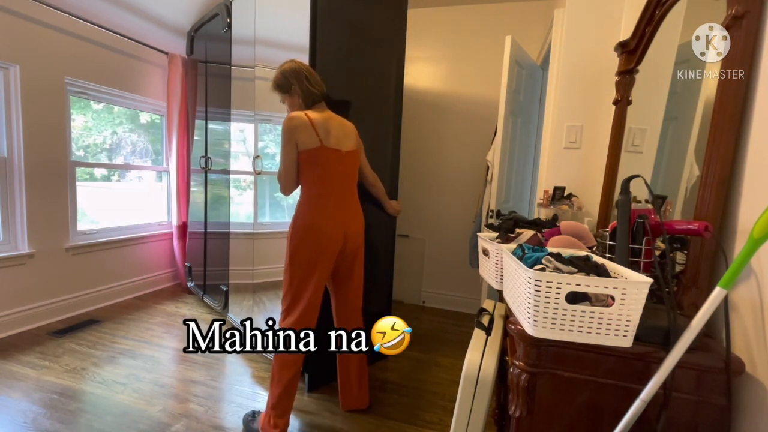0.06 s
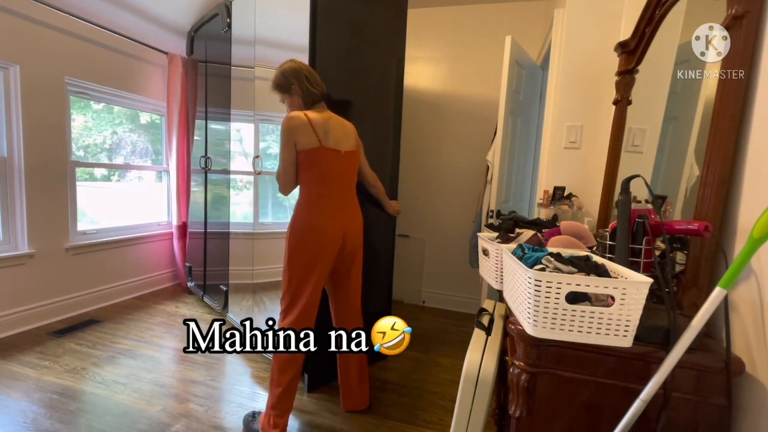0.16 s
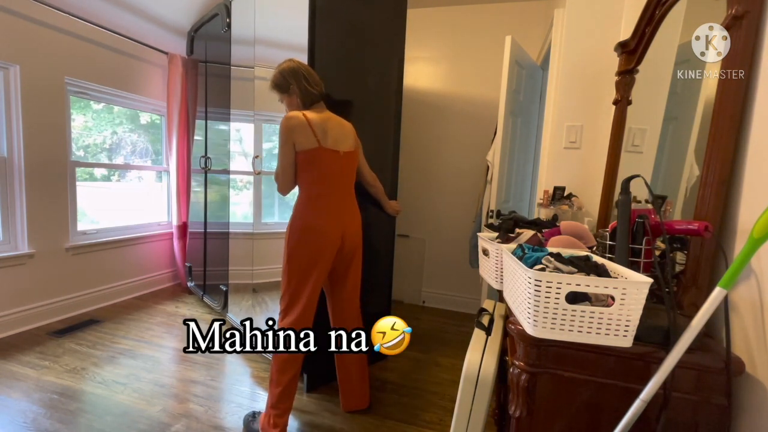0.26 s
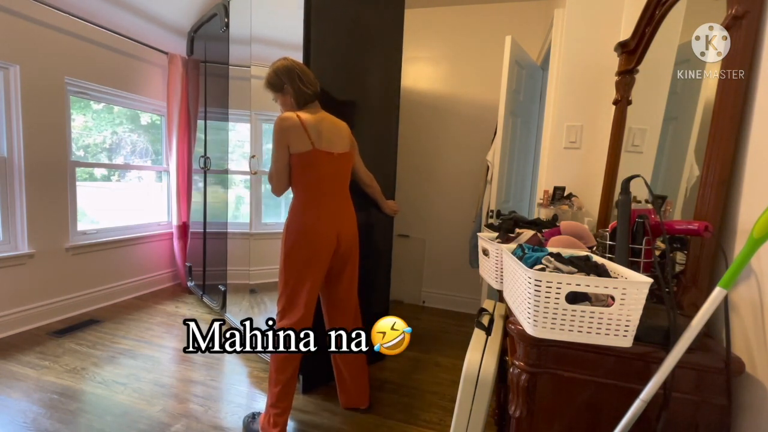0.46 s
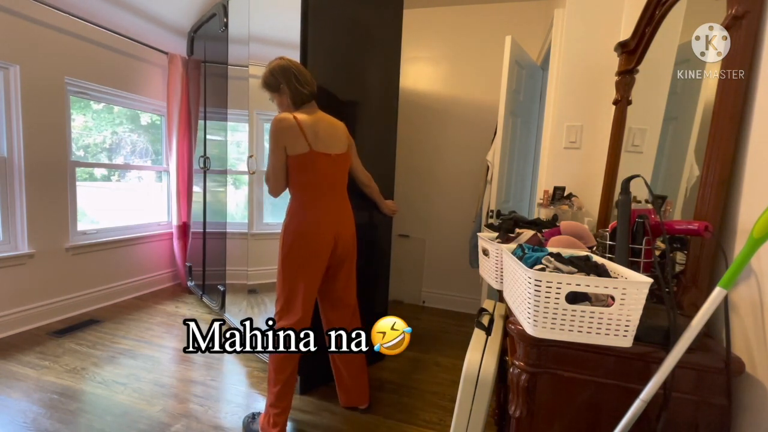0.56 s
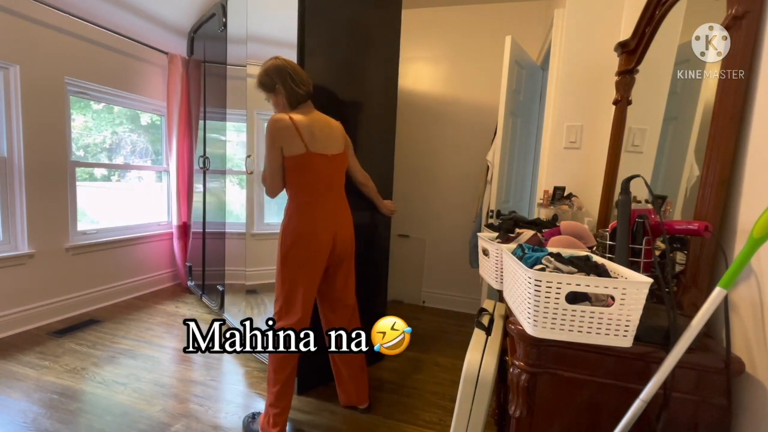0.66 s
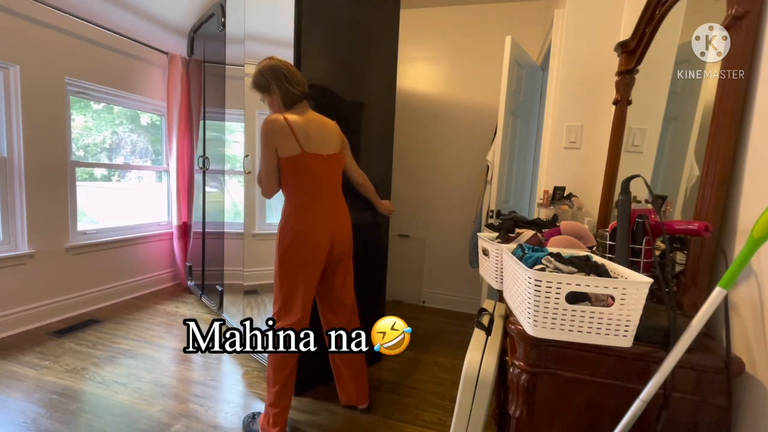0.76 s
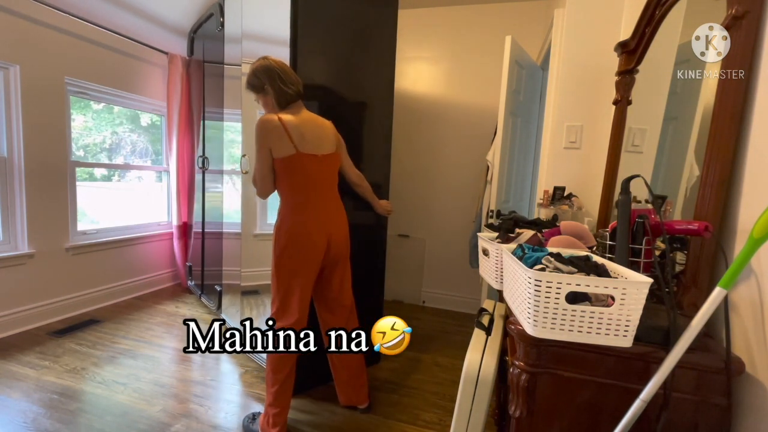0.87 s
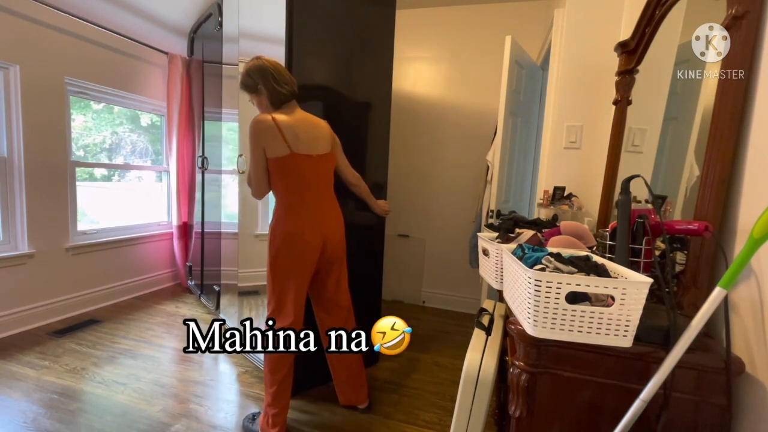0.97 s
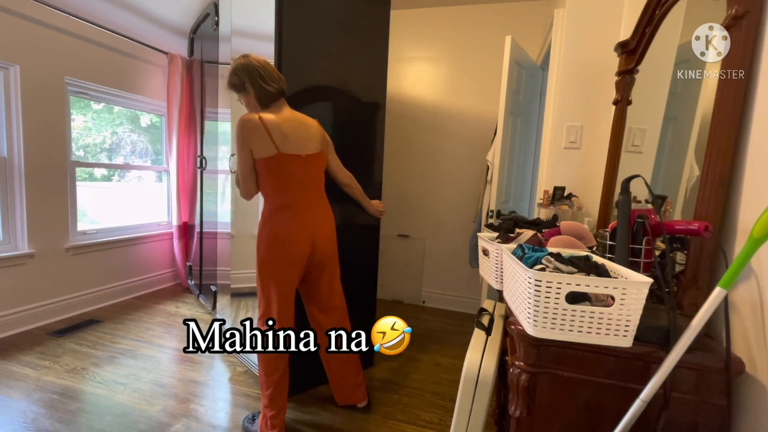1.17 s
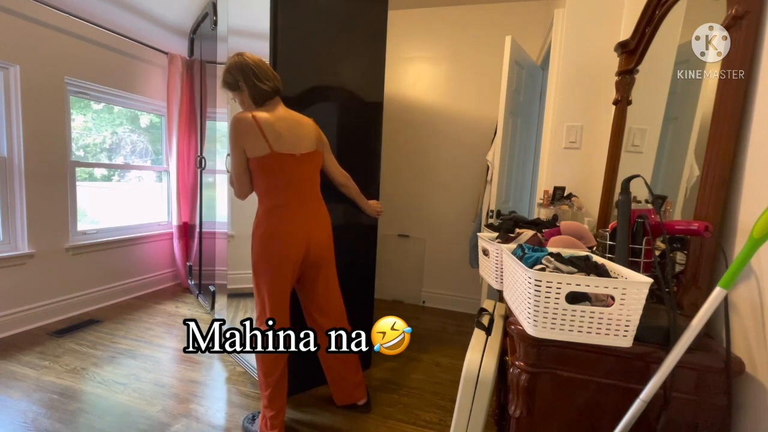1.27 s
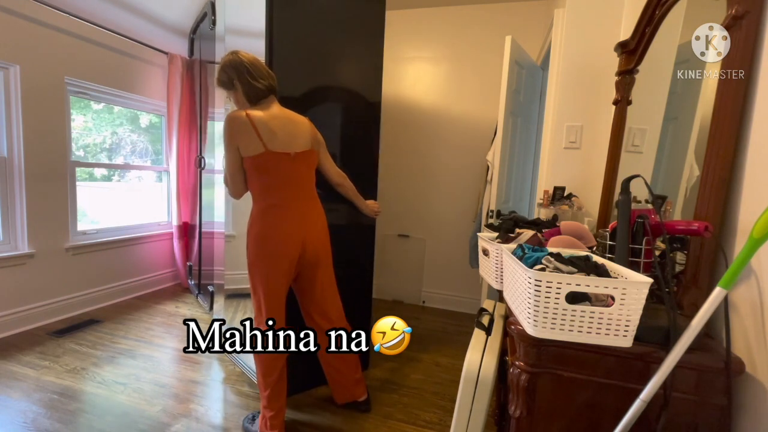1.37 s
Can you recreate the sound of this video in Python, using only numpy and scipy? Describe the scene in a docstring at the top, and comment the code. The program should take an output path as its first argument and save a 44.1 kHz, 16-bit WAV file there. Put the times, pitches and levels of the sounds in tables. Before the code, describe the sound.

A wooden wardrobe is pushed across a hardwood floor, a few metres away in a bare, live room. From 0 to 0.3 s it shudders low and bumps dully under a quickly fading rustle; a faint tick follows at 0.31. From 0.37 it slides in rapid stuttering knocks with gritty scrape, hiss and faint wavering panel tone, stronger after 0.9, pausing briefly before a firmer knock at 1.33.

```python
"""A tall wooden wardrobe is pushed over a hardwood floor, a few metres away in a bare bedroom.
First it shudders at a low pitch and bumps dully (filtered noise bursts), over a rumbling hollow case (noise).
A rustle fades and a dry tick leads in; then it creeps in stick-slip jerks, each knocking the same panels
(decaying sines, a noise clack and a room tail), while its feet scrape and hiss (gritty noise) and a panel
sings (a wavering sine). Near the end comes one firmer knock."""
import sys
import numpy as np
from scipy import signal
from scipy.fft import rfft, irfft, next_fast_len
from scipy.io import wavfile
from scipy.ndimage import uniform_filter1d

SR = 44100
rng = np.random.default_rng(int(sys.argv[2]) if len(sys.argv) > 2 else 0)


def digitize_waveform(pressure):
    """Quantize a signal to 16-bit integers and store it at the path in sys.argv[1].

    Rows of a 2-D input are taken as channels; values are limited to [-1, 1].
    """
    field = np.atleast_2d(pressure).T
    bounded = np.clip(field, -1, 1)
    quanta = np.round(bounded * 32767).astype(np.int16)
    wavfile.write(sys.argv[1], SR, quanta)


N = 61739  # samples, 1.4 s


def undb(db):
    """Turn dB into an amplitude factor."""
    return 10 ** (np.asarray(db) / 20)


def unit(x):
    """Scale to rms 1."""
    return x / np.sqrt(np.mean(x ** 2))


def blow(x, db):
    """Scale a ring to a total energy in dB, averaged over its channels."""
    return unit(x) * undb(db) / np.sqrt(N)


def pan(db):
    """Left and right gains whose difference, left minus right, is the given dB."""
    return undb(np.array([[db], [-db]]) / 2)


def curve(rows):
    """Gain along (t/s, level/dB) points, with straight lines in dB between them."""
    t, db = np.array(rows).T
    return undb(np.interp(np.arange(N) / SR, t, db))


def fade(t60):
    """Exponential decay that falls 60 dB in t60 seconds."""
    return np.exp(-np.log(1000) * np.arange(N) / SR / t60)


def noise(likeness=0.):
    """Two white noises with a given left-right correlation."""
    mid, side = rng.standard_normal((2, N))
    c = np.clip(likeness, -1, 1)
    opposite = np.array([[1], [-1]])
    return (np.sqrt(1 + c) * mid + np.sqrt(1 - c) * side * opposite) / np.sqrt(2)


def colour(x, points):
    """Causal minimum-phase filter through (f/Hz, level/dB) points."""
    size = next_fast_len(N, True) * 2
    hz, db = np.array(points, float).T
    f = np.maximum(np.arange(size // 2 + 1) * SR / size, 1)
    gain = undb(np.interp(np.log(f), np.log(hz), db))
    # folding the cepstrum onto positive times gives the minimum phase
    cepstrum = irfft(np.log(gain))
    cepstrum[1:size // 2] *= 2
    response = np.exp(rfft(cepstrum[:size // 2], size))
    return irfft(rfft(x, size) * response)[..., :N]


def tilt(x, db_per_octave, low_hz, high_hz):
    """Brighten or dull between two frequencies, as harder or softer contact does."""
    swing = db_per_octave * np.log2(high_hz / low_hz) / 2
    return colour(x, [(low_hz, -swing), (high_hz, swing)])


def at(x, s):
    """Delay a sound to its start time in seconds."""
    return np.pad(x, ((0, 0), (max(int(s * SR), 0), 0)))[:, :N]


def drift(rate_hz):
    """Noise smoothed over one period of the rate, with rms 1."""
    return unit(uniform_filter1d(rng.standard_normal(N), size=int(SR / rate_hz)))


def air():
    """The still air of the room: steady, low-weighted noise."""
    # spectrum of the air: f/Hz, level/dB
    air_colour = [(25, -30), (60, -12), (120, -0.5), (400, -7.5), (1500, -29), (3000, -40), (14000, -54)]
    return undb(-69) * unit(colour(noise(likeness=0.13), air_colour))


def rustle():
    """A rustle of treble noise that dies away from the start at a steady rate in dB."""
    # spectrum of the rustle: f/Hz, level/dB
    rustle_colour = [(500, -30), (1300, -30), (1800, -5), (4000, -0.5), (6000, -8), (9000, -10),
                     (15000, -31)]
    start_db, fade_db_per_s = -61.5, 141
    level = undb(start_db - fade_db_per_s * np.arange(N) / SR)
    return unit(colour(noise(likeness=0.11), rustle_colour)) * level


def tick():
    """One faint dry tick: a noise burst that decays within a millisecond or so."""
    # spectrum of the tick: f/Hz, level/dB
    tick_colour = [(500, -3), (2500, 8), (7000, -5), (10000, -18), (15000, -6.5)]
    start_s, t60_s, level_db = .3115, 0.001, -37.5
    burst = colour(noise(likeness=0.76) * fade(t60_s), tick_colour)
    return at(blow(burst, level_db), start_s)


def rumble():
    """The hollow case and the floor drone: low noise, alike in both ears, with a drawn level."""
    # resonances of case and floor: f/Hz, level/dB
    rumble_colour = [(30, -45), (70, -31), (92, -6), (104, 0), (118, -4), (136, 2.5), (155, -2.5),
                     (185, -7.5), (245, -19), (290, -9), (390, -21), (900, -67.5)]
    # level of the drone: t/s, level/dB
    rumble_level = [(0, -62.5), (.27, -53), (.32, -46), (.38, -55.5), (.46, -57), (.65, -57), (.88, -61),
                    (1.03, -56.5), (1.3, -58.5), (1.4, -54)]
    return unit(colour(noise(likeness=1.0), rumble_colour)) * curve(rumble_level) * pan(db=-4.0)


def shudders():
    """The whole case judders on its feet at a low pitch that rises with the force."""
    # each shudder: start t/s, attack t/s, hold t/s, release t/s, f/Hz at full swell, level/dB
    shudder_rows = [(-.02, 0.014, 0.051, 0.066, 59.3, -45.5), (0.076, 0.036, 0.038, 0.027, 54.3, -50),
                    (.187, 0.0397, 0.0437, 0.048, 70.44, -27.5)]
    # partials of the judder: multiple of its pitch, level/dB
    partials = [(1, 0), (1.45, -14.5), (2, -11.5), (2.45, -17.5), (3.25, -22.5)]
    # spectrum of the rough noise in it: f/Hz, level/dB
    rough_colour = [(32, -26), (46, -6), (60, -11.5), (100, 0.5), (150, -0.5), (220, -11), (330, -24.5),
                    (600, -61)]
    sag, wander_depth = 0.316, 0.0083  # fractions of the pitch
    rough_db, pan_db = -15, -4.5
    t, out = np.arange(N) / SR, 0
    for start, attack, hold, release, hz, db in shudder_rows:
        rise = (t - start) / attack
        fall = 1 - (t - start - attack - hold) / release
        swell = np.clip(np.minimum(rise, fall), 0, 1)
        wander = unit(uniform_filter1d(rng.standard_normal(N), size=1300))  # smoothed over 29 ms
        pitch = hz * (1 - sag * (1 - swell) + wander_depth * wander)
        phase = 2 * np.pi * np.cumsum(pitch * (t > start)) / SR
        tone = sum(undb(partial_db) * np.sin(multiple * phase) for multiple, partial_db in partials)
        rough = undb(rough_db) * unit(colour(noise(likeness=0.85), rough_colour))
        out = out + undb(db) * np.sin(swell * np.pi / 2) ** 2 * (tone + rough)
    return out * pan(pan_db)


def bumps():
    """Dull bumps of the case taking its weight before the slide: decaying noise, each with its own brightness."""
    # each bump: t/s, level/dB, t60/s, brightness/dB per octave
    bump_rows = [(0.054, -11, 0.42, -10), (.192, -12.5, 0.48, -1.5), (.228, -14, 0.28, 1.5)]
    # spectrum of a bump: f/Hz, level/dB
    bump_colour = [(40, 2), (130, -11.5), (230, 3), (400, 1.5), (750, 0), (1300, -10), (2200, -26),
                   (4000, -51.5), (12000, -55)]
    out = 0
    for s, db, t60, bright in bump_rows:
        thud = colour(noise(likeness=0.11) * fade(t60), bump_colour)
        thud = tilt(thud, bright, low_hz=192, high_hz=1780)
        out = out + at(blow(thud, db), s)
    return out


def sing():
    """Steady rubbing holds the lowest panel tone in a soft sine that wavers in pitch and level."""
    # level of the singing: t/s, level/dB
    sing_level = [(.355, -99), (.385, -68), (.43, -70.5), (.47, -60), (.54, -60.5), (.58, -66),
                  (.72, -63.5), (.82, -64.5), (.885, -73), (.92, -61), (1.04, -59), (1.24, -59),
                  (1.29, -69), (1.35, -61.5), (1.4, -67)]
    pitch_hz, wander_depth, change_hz = 458, 0.0076, 25.4  # depth as a fraction of the pitch
    flicker_db, pan_db = 2, -0.5
    pitch = pitch_hz * (1 + wander_depth * drift(change_hz))
    tone = unit(np.sin(2 * np.pi * np.cumsum(pitch) / SR))
    flicker = undb(flicker_db * drift(change_hz))
    return tone * curve(sing_level) * flicker * pan(pan_db)


def friction(spectrum):
    """Rubbing noise with specks of grit: random short noise grains of scattered strength."""
    grit_per_s, scatter_db, grit_db = 700, 4, -5
    strength = undb(scatter_db * np.minimum(rng.exponential(size=N), 4))
    specks = (rng.random(N) < grit_per_s / SR) * strength
    grain = noise() * fade(0.0078)
    grit = signal.fftconvolve(specks[None], grain, axes=1)[:, :N]
    return unit(colour(noise() + undb(grit_db) * unit(grit), spectrum))


def scrape():
    """The feet rub over the boards: a woody scrape and a fine, flickering hiss."""
    # spectrum of the woody scrape: f/Hz, level/dB
    scrape_colour = [(100, -19.5), (300, -7), (390, -8), (460, 3), (620, -1.5), (770, 0), (1200, 4),
                     (1800, -1.5), (2400, 0), (3500, -8), (6000, -16), (9500, -20.5), (16000, -33)]
    # sliding speed, heard as the level of the scrape: t/s, level/dB
    slide_level = [(.361, -66), (.369, -53.5), (.43, -57), (.5, -58), (.66, -52), (.755, -53.5),
                   (.795, -54.5), (.825, -52), (.885, -59.5), (.93, -51.5), (.99, -49.5), (1.21, -49),
                   (1.25, -51.5), (1.28, -55.5), (1.32, -56), (1.35, -52.5), (1.4, -55)]
    # spectrum of the hiss: f/Hz, level/dB
    hiss_colour = [(1500, -12), (3500, -0.5), (6000, 2), (9500, 3), (11500, -1), (13500, 4.5), (14600, -4),
                   (16000, -3.5)]
    # level of the hiss of the gliding feet, before its flicker: t/s, level/dB
    hiss_level = [(.35, -110), (.382, -63), (.52, -59.5), (.75, -60.5), (.80, -68.5), (.825, -65),
                  (.885, -84), (.94, -66), (.99, -62), (1.22, -61), (1.25, -67.5), (1.28, -61.5),
                  (1.32, -66), (1.4, -74)]
    flicker_db, flicker_hz = 1, 29.2
    flicker = undb(flicker_db * drift(flicker_hz))
    hiss = friction(hiss_colour) * curve(hiss_level) * flicker * pan(db=5.5)
    woody = friction(scrape_colour) * curve(slide_level) * pan(db=3)
    return woody + hiss


def modes(table, db):
    """Struck resonances as decaying sines; the higher they are, the more their phase differs at the ears."""
    ear_lag_s = .0004  # greatest lag between the ears
    t, ring = np.arange(N) / SR, 0
    for (hz, mode_db, t60, side, arrival), lag in zip(table, rng.uniform(-1, 1, len(table))):
        ears = t + ear_lag_s * lag * np.array([[1], [-1]]) / 2
        onset = 1 - fade(0.0023)  # softens the attack
        tone = np.sin(2 * np.pi * hz * ears) * fade(t60) * onset
        ring = ring + at(undb(mode_db) * pan(side) * tone, arrival)
    return blow(ring, db)


def knock():
    """One jerk: a hollow knock with a short clack, the ringing panels and the room's tail."""
    # dense wooden clack: f/Hz, level/dB
    clack_colour = [(150, -35), (370, -23), (470, 1), (680, 0), (780, -4), (1020, 1), (1350, 0),
                    (1750, -1.5), (2300, 0.5), (2700, -11), (3200, -4.5), (4500, -9.5), (7000, -17.5),
                    (10000, -23), (15000, -44)]
    # short hollow knock through foot, boards and case: f/Hz, level/dB, t60/s, left-right/dB, arrival t/s
    foot_modes = [(985, 2.5, .026, 2, .001), (1130, -5, .025, 1, .001), (620, -5.5, .035, 3, .009),
                  (1310, -4.5, .028, 0, .005), (1800, -4, .025, 3, .0005), (2080, -1, .026, 4, .0005),
                  (2340, -.5, .024, 4, .006), (3010, -3, .024, 2, .001), (4480, -7.5, .018, 2, .004)]
    # ringing of the panels: f/Hz, level/dB, t60/s, left-right/dB, arrival t/s
    panel_modes = [(457, -5, .3, 3, .002), (523, -4, .25, 3, .002), (554, -7, .25, 2, .009),
                   (608, -7.5, .3, 2, .009), (705, -5, .3, 4, .009), (925, -4, .2, 0, 0),
                   (976, -1, .25, 2, 0), (1033, -3, .25, 2, 0), (1110, -5, .25, 2, 0),
                   (1297, -6, .25, 2, .006), (1600, -8, .15, 3, .006), (2018, -1, .25, 6, 0),
                   (2078, -5, .25, 4, 0), (2935, -6, .2, 4, 0), (4474, -15, .15, 2, .004)]
    clack_db, room_db, foot_db, panel_db = 10.5, 11.8, 15, 12.5
    clack_t60_s, room_t60_s, room_treble_t60_s = 0.12, 0.25, 0.52
    clack = blow(colour(noise() * fade(clack_t60_s), clack_colour), clack_db)
    # the treble of the tail outlasts its lows
    lows = colour(noise() * fade(room_t60_s), [(2000, -1.0), (5000, -5)])
    highs = colour(noise() * fade(room_treble_t60_s), [(2000, -15), (5000, -4)])
    room = blow(colour(lows + highs, clack_colour), room_db)
    return (clack + room) * pan(db=1.5) + modes(foot_modes, foot_db) + modes(panel_modes, panel_db)


def jerks():
    """The foot sticks and lets go; each release strikes the same wood with its own colour and treble."""
    # releases of the foot: t/s, level/dB relative to the knock, treble/dB per octave
    jerk_rows = [(0.368, -40.5, -7), (0.386, -45, 0.5), (0.428, -51.5, 9), (0.447, -42.5, 1),
                 (0.466, -39, -5), (0.486, -42, -1.5), (0.507, -37, -14), (0.528, -39.5, -9),
                 (0.553, -39.5, -15), (0.582, -40.5, -3), (0.607, -39.5, -4.5), (0.631, -39.5, -8),
                 (0.656, -37, -4), (0.683, -38.5, -6), (0.71, -37.5, -1.5), (0.745, -37.5, -2),
                 (0.806, -36.5, 3), (0.83, -49.5, -1), (0.9, -34, 3), (0.948, -37, 4), (0.983, -36, 3.5),
                 (1.017, -34.5, 4.5), (1.055, -34.5, 3), (1.086, -36.5, 2), (1.115, -36, 2),
                 (1.144, -33.5, 0), (1.178, -35, 3.5), (1.211, -34, 1), (1.325, -30.5, -0.5),
                 (1.343, -38.5, -2.5)]
    scatter_db = 2.5  # each release colours the ring a little differently
    treble_from_hz, treble_to_hz = 2300, 7000
    bands = np.geomspace(400, 6400, 9)  # Hz
    octaves = np.log2(np.clip(bands, treble_from_hz, treble_to_hz) / treble_from_hz)
    chances = rng.standard_normal((len(jerk_rows), len(bands)))
    ring, out = knock(), 0
    for (s, db, treble), chance in zip(jerk_rows, chances):
        band_db = scatter_db * chance + treble * octaves
        spot = colour(ring, np.column_stack([bands, band_db]))
        out = out + undb(db) * at(spot, s)
    return out


def scene():
    """Layer the sources, from the background to the jerks."""
    background = air() + rustle() + tick()
    case = rumble() + shudders() + bumps()
    return background + case + sing() + scrape() + jerks()


def record(dry):
    """Cut the deepest bass gently and the top steeply."""
    high_pass = signal.butter(4, 32, "high", fs=SR, output="sos")
    low_pass = signal.ellip(8, .2, 70, 15400, fs=SR, output="sos")  # ripple dB, stop dB, Hz
    return signal.sosfilt(low_pass, signal.sosfilt(high_pass, dry))


dry = scene()
out = record(dry)
digitize_waveform(out)
```